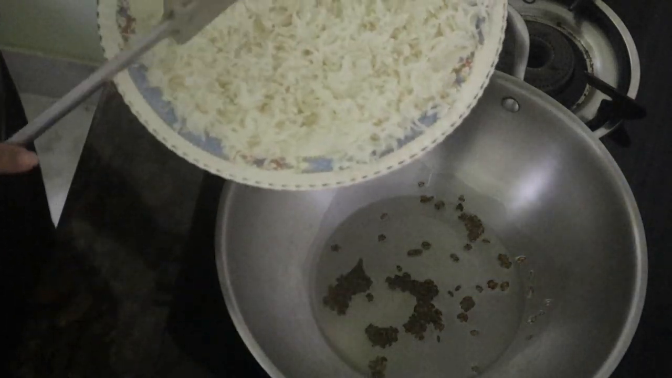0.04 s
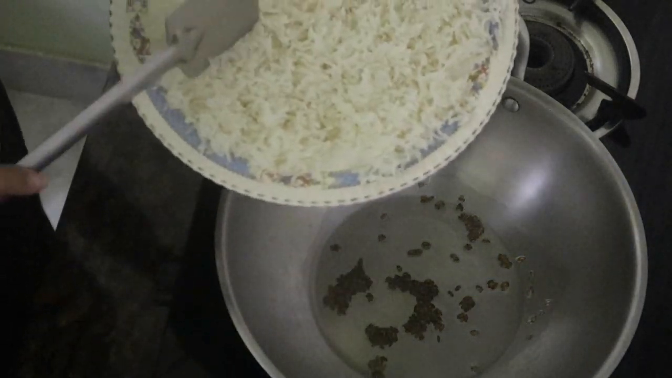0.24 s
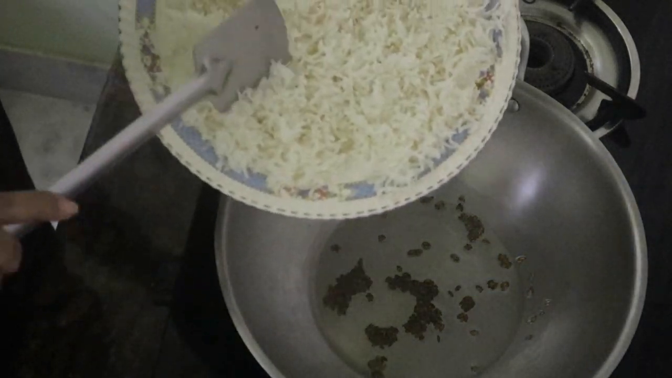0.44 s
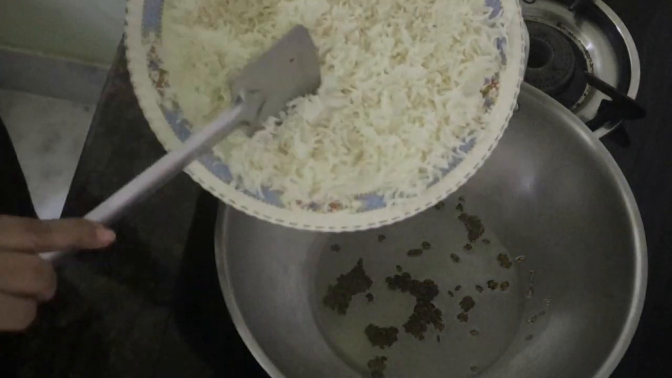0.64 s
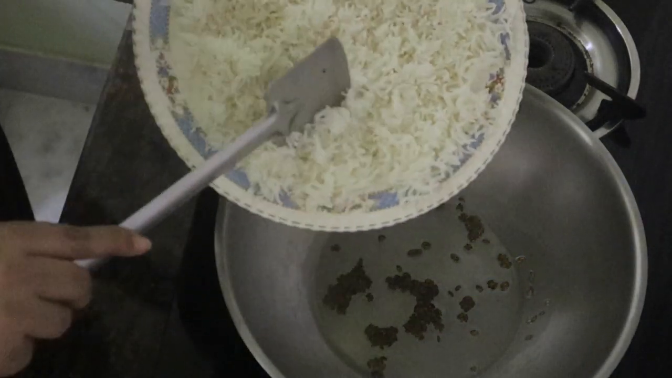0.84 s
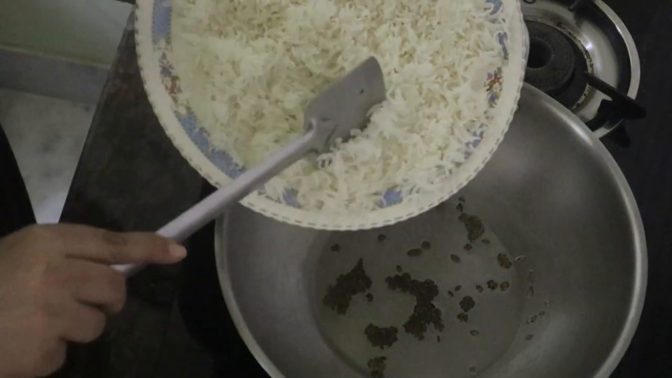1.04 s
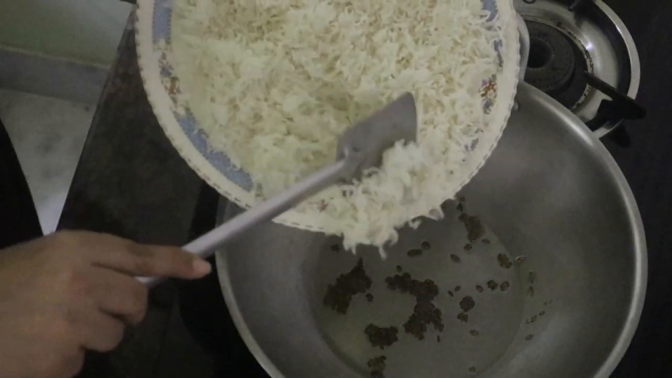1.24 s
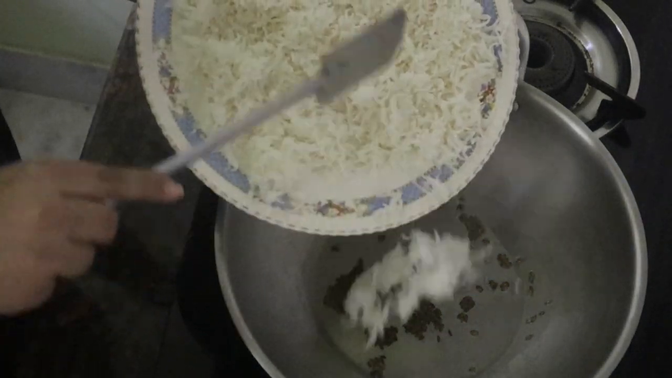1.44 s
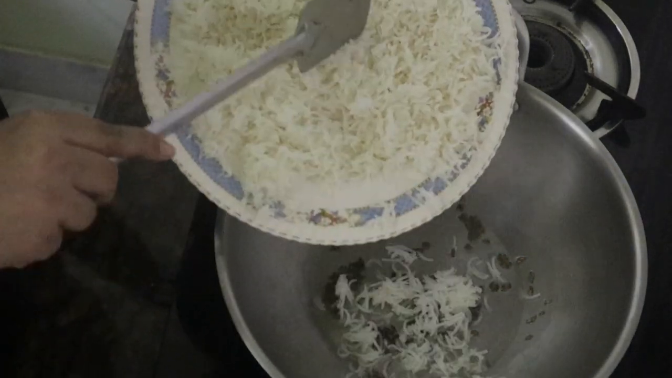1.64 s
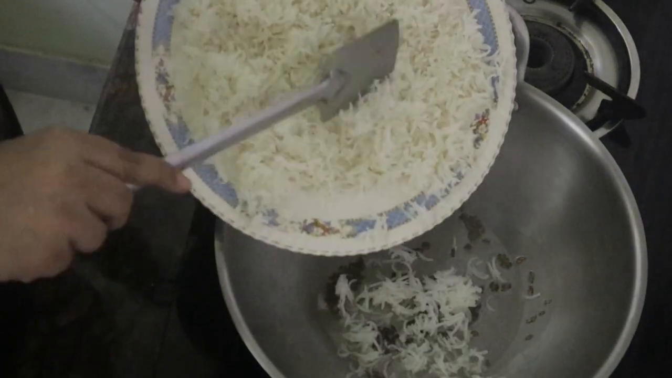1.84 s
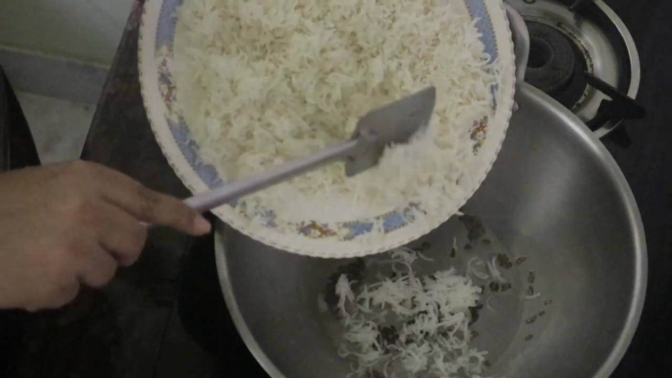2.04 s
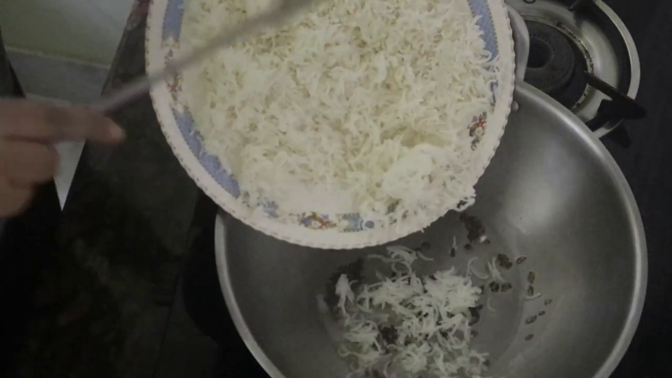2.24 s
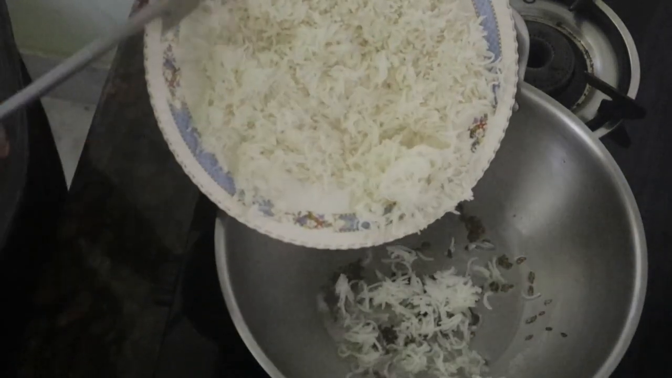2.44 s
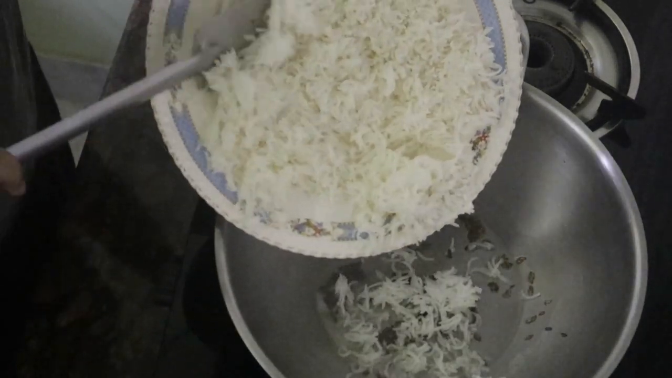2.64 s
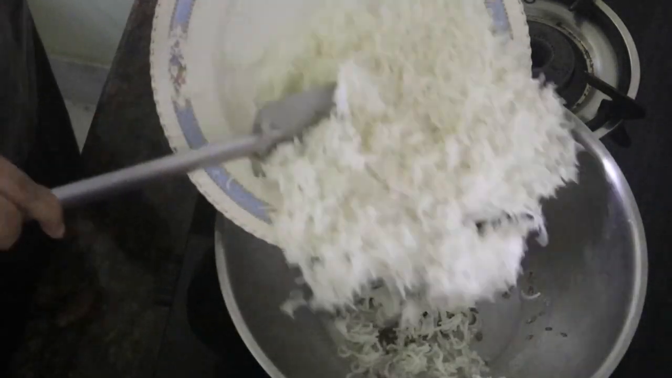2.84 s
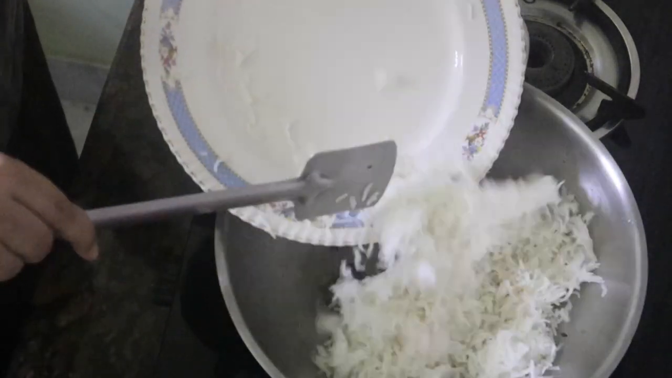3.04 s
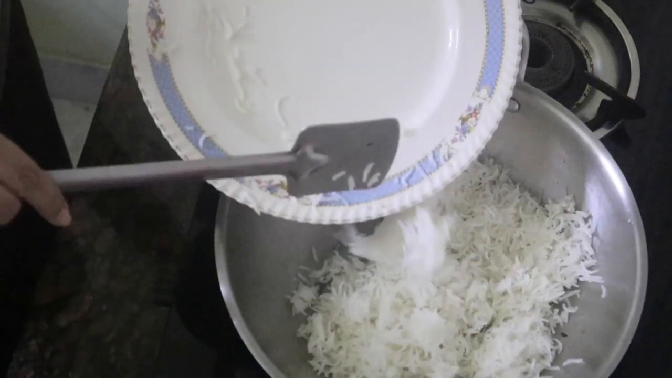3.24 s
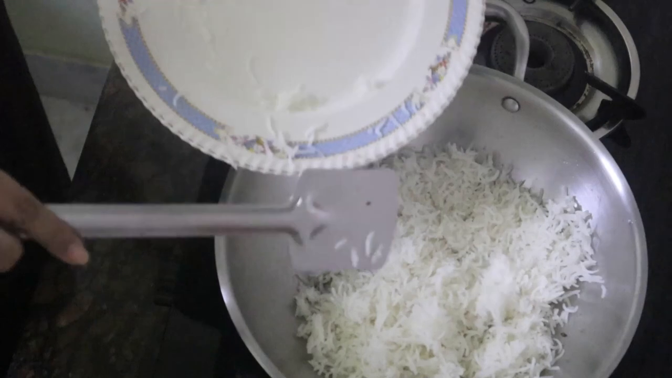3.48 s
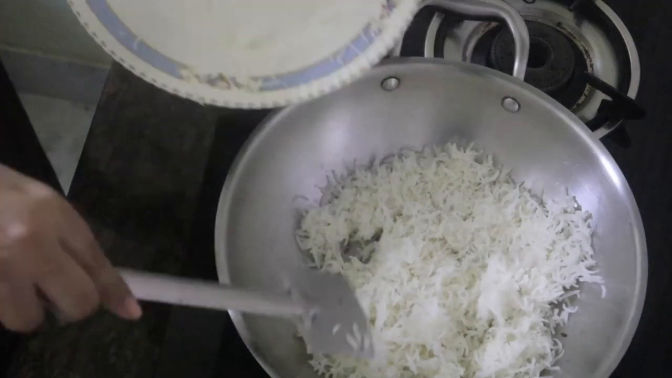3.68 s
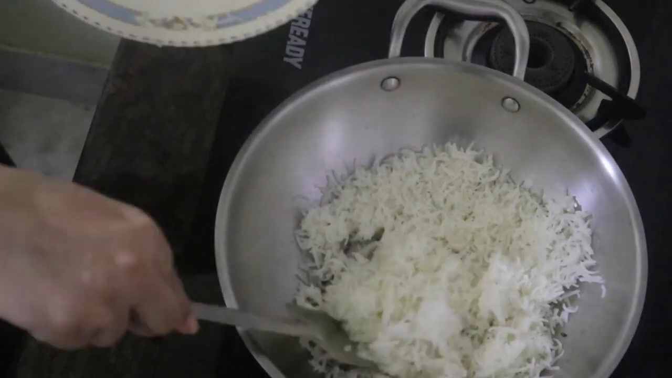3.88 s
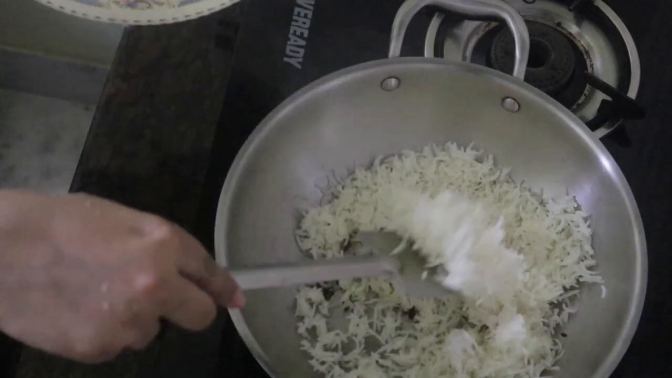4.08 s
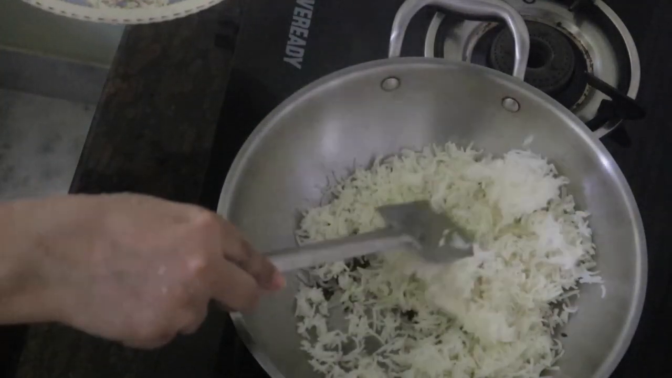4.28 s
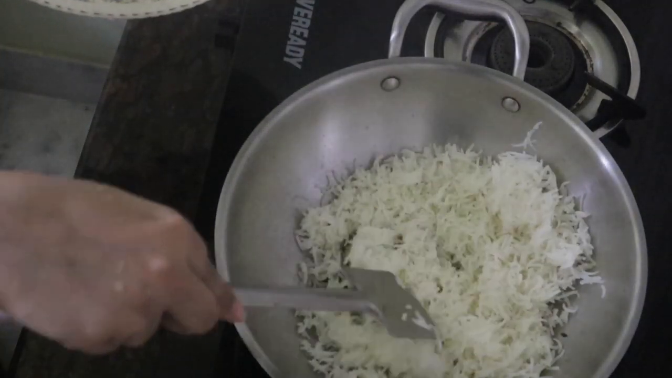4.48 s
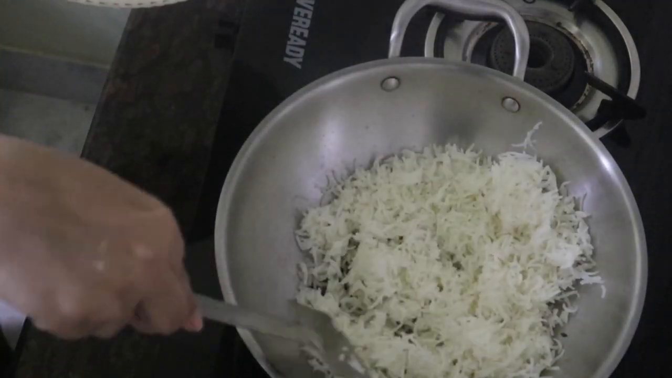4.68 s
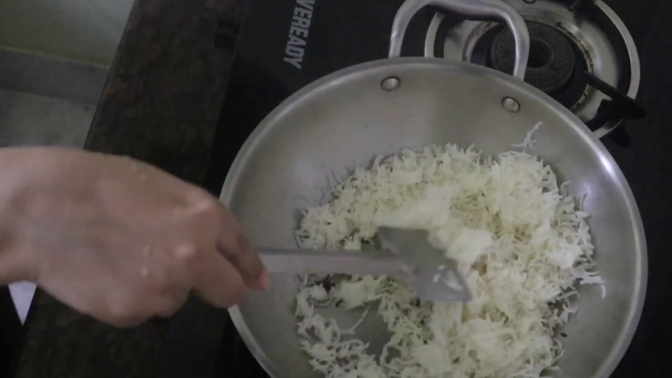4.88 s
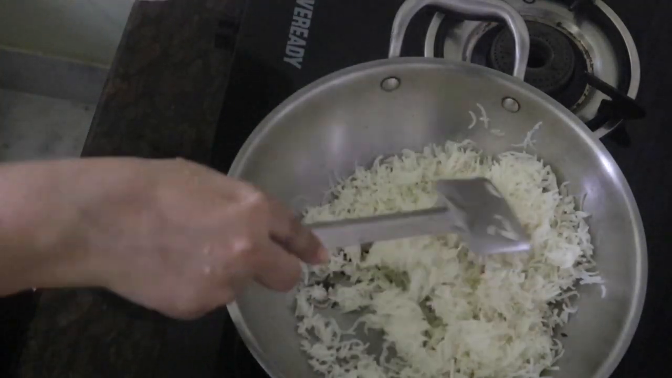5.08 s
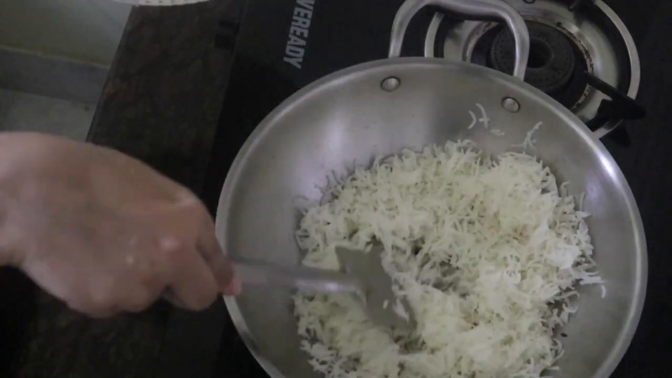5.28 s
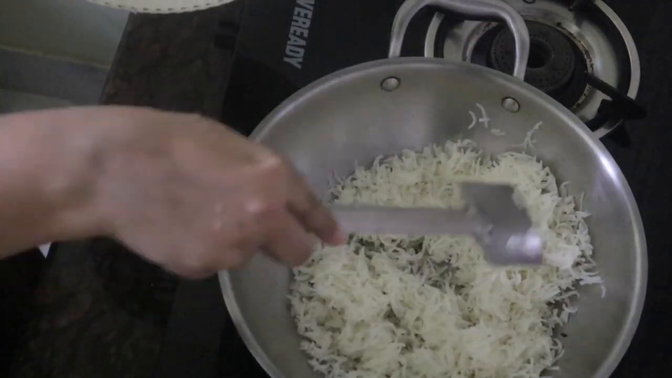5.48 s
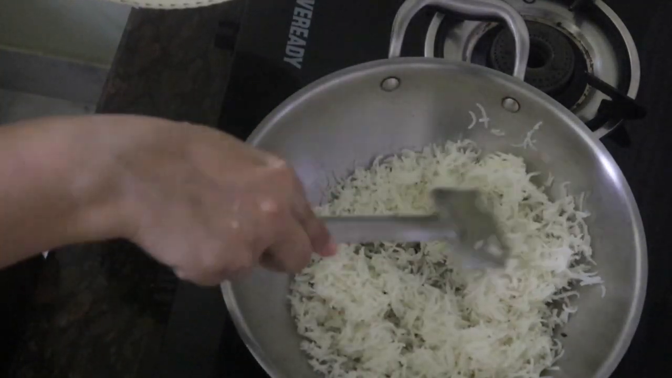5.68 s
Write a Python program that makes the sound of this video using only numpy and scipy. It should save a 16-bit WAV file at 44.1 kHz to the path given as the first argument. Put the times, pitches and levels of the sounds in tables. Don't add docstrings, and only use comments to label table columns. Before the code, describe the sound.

Moist rice falls into hot fat in a steel wok and bursts into a loud, popping, crackling sizzle that slowly calms as it is turned.

```python
import sys
import numpy as np
from scipy import signal
from scipy.fft import rfft, irfft, next_fast_len
from scipy.io import wavfile
from scipy.ndimage import uniform_filter1d

SR = 44100
rng = np.random.default_rng(int(sys.argv[2]) if len(sys.argv) > 2 else 0)


def natural_amplitude(level_db):
    exponent = np.asarray(level_db, float) / 20
    return 10 ** exponent


def wav_record(signal):
    frames = np.transpose(np.atleast_2d(signal))
    bounded = np.clip(frames, -1, 1)
    quanta = np.round(bounded * 32767).astype(np.int16)
    wavfile.write(sys.argv[1], SR, quanta)


N = 252252
CONTACT_S = 1.446

# [f/Hz, level/dB per Hz]
KITCHEN_SPECTRUM = [(40, -53), (100, -34), (140, -15.5), (200, -7), (420, -14), (600, -10.5), (830, -12),
                    (1400, -17), (2300, -23), (5500, -40), (10900, -35), (14000, -46), (15500, -62)]
# [f/Hz, width/Hz, level/dB]
HUM_MODES = [(193, 15.6, 1), (272.3, 15.6, 1), (335.3, 21, 1.5), (523, 28, -8)]
# [f/Hz, level/dB]
KITCHEN_WIDTH = [(60, -36), (110, -4), (200, -16), (380, -7), (700, -6.5), (1290, 1), (2380, 3), (4400, 7),
                 (8120, 2), (15000, -30)]
# [t/s, gain/dB]
CAMERA_GAIN = [(1.43, -3), (1.78, -8.5), (2.75, -7.5), (3.3, -8.5), (3.65, -13.5), (4.25, -12.5),
               (4.64, -20.5), (5.25, -17.5), (5.72, -18)]
# [t/s, peak/dB, decay/ms]
STEAM_FLARES = [(.22, -40, 4), (1.458, -36, 2.5), (1.53, -21, 2.4), (1.559, -13, 2.4), (1.605, -10, 3.2),
                (1.654, -8, 2.5), (1.671, -6, 2.8), (1.715, -11, 2.8), (1.829, -7, 2.2), (2.2422, -12, 1.7),
                (2.3005, -13, 2.2), (2.383, -10, 2.5), (2.4297, -6, 3), (2.504, -15, 2.3),
                (3.048, -7.5, 2.8), (5.0764, -16, 2.5)]
# [t/s, small bubbles on bare fat/dB, large bubbles under the rice/dB]
BOIL_LEVELS = [(1.45, -32.5, -54), (1.58, -25.5, -44.5), (1.62, -16, -43.5), (1.77, -22, -45),
               (1.97, -21, -40), (2.0, -23.5, -43), (2.55, -26, -35.5), (2.98, -27, -37),
               (3.04, -20.5, -34.5), (3.28, -22, -33), (3.33, -26.5, -33.5), (3.47, -20, -36.5),
               (3.83, -24, -39.5), (4.02, -19.5, -34), (4.18, -26.5, -38.5), (4.75, -31, -44.5),
               (5.3, -29.5, -40.5), (5.72, -31, -46.5)]
# [t/s, hold/s, fizz boost/dB, crackle boost/dB]
WET_SURGES = [(1.495, 0.01, -3, -5), (3.15, 0.015, -0.5, 3), (1.513, 0.021, 3, 0), (1.585, .008, -0.5, -3),
              (1.712, 0.011, -0.5, 0), (2.239, 0.016, -5, -5), (2.391, .012, 7.5, 3),
              (1.651, 0.0092, -0.5, 5), (1.772, 0.054, 1.5, 3.5), (2.01, 0.11, -1, 3.5),
              (2.136, 0.042, 1, 3.5), (2.285, 0.013, 4, 3.5), (2.347, 0.05, 0.5, 0.5), (2.471, .008, 5, 0),
              (2.503, .006, 5, -2), (2.597, 0.045, 3.5, 5), (2.675, 0.051, 1, 5.5), (2.785, 0.063, 3, -0.5),
              (3.002, 0.026, 3, 4), (4.15, 0.0043, -3, 8), (4.277, 0.045, 1.5, 3.5), (4.414, 0.02, 4, 6.5),
              (4.473, 0.023, 7, 6.5), (4.5, 0.077, 0.5, 2.5), (4.736, 0.018, -1.5, 5),
              (4.871, 0.11, 2.5, 3.5), (5.11, 0.011, -3, 3), (5.254, .006, 3.5, 9),
              (5.338, 0.042, 2.5, 2.5), (5.431, 0.047, 0.5, 2.8), (5.493, .05, -0.2, -1)]
# [f/Hz, level/dB per Hz]
FIZZ_SPECTRUM = [(2650, -12.5), (4500, -4), (6220, -4.5), (11500, 2), (15100, -16.5), (16000, -31)]
# [f/Hz, level/dB per Hz]
CRACKLE_SPECTRUM = [(700, -31), (1500, -32.5), (2100, -8.5), (2700, -2.5), (4000, -0.5), (5500, -3.5),
                    (8000, -6), (13000, -81), (16000, -12)]
# [f/Hz, level/dB]
PAN_WIDTH = [(200, -15), (700, -2), (1300, -2), (2400, 1), (4400, 2.5), (6500, 3.5), (9000, -0.5),
             (15000, 4.5)]
# [f/Hz, width/Hz, level/dB]
BOWL_MODES = [(542.7, 13.3, 0.5), (690.6, 18, 2.5), (737.5, 8.7, 3.2), (790, 14, -7), (874, 8.7, -1.5),
              (1228, 12, 3), (1710, 10, -19), (1808, 15, 2), (1990, 13, -1.5), (2180, 17, -26),
              (2560, 54, -7), (3166, 35, 1.5), (4040, 20, -3.5)]
# [t/s, level/dB]
GRAIN_TAPS = [
    (1.455, -41),
    (1.49, -41),
    (1.568, -39),
    (1.598, -42),
    (1.64, -36),
]
# [f/Hz, level/dB, t60/s]
TAP_MODES = [(960, 1.5, 0.43), (1960, 0.5, 0.12), (3080, -4, 0.19), (3760, -5, 0.27), (4700, -8, .1),
             (5900, -8, .09)]
# [t/s, peak/dB, dull share/0-1]
BURST_TICKS = [(1.4657, -25, 0.09), (1.469, -22, 0.05), (1.5131, -21, 0.26), (1.5299, -15, 0.21),
               (1.5678, -4, 0.23), (1.5774, -11, 0.38), (1.6722, -2, 0.2), (1.7999, -8, 0.26),
               (1.8747, -9, 0.22), (2.0164, -9, 0.52), (2.0305, -12, 0.21), (2.0442, -12, 0.51),
               (2.0943, -12, 0.58), (2.1378, -11, 0.58), (2.158, -11, 0.71), (2.2025, -6, 0.43),
               (2.2196, -7, 0.65), (2.3009, -3, 0.29), (2.3728, -10, 0.4), (2.4079, -5, 0.37),
               (2.4223, -5, 0.5), (2.4318, -2, 0.26), (2.6002, -10, 0.21), (2.6793, -11, 0.77),
               (2.7363, -11, 0.58), (2.9109, -9, 0.68), (2.9132, -13, 0.39), (2.9544, -10, 0.53),
               (3.0289, -5, 0.46), (3.0494, -3, 0.27), (3.056, -5, 0.22), (3.0861, -8, 0.29),
               (3.2303, -7, 0.6), (3.2413, -8, 0.39), (3.2967, -7, 0.38), (3.3776, -8, 0.35),
              (3.3973, -10, 0.45), (3.4995, -6, 0.34), (3.5386, -6, 0.31), (3.6787, -10, 0.15),
              (3.9549, -9, 0.23), (4.0631, -6, 0.25), (4.181, -10, 0.52), (4.2452, -14, 0.23),
              (4.2752, -8, 0.4), (4.3079, -9, 0.12), (4.4054, -13, 0.53), (4.4795, -5, 0.71),
              (4.5336, -14, 0.45), (4.5359, -14, 0.57), (4.5729, -14, 0.2), (4.6478, -17, 0.52),
              (4.6796, -17, 0.43), (4.7332, -17, 0.65), (4.7953, -18, 0.19), (4.8817, -15, 0.43),
              (4.9575, -11, 0.45), (5.002, -16, 0.2), (5.0778, -16, 0.22), (5.0895, -14, 0.16),
              (5.2159, -16, 0.53), (5.2776, -15, 0.36), (5.3122, -15, 0.44), (5.3651, -14, 0.12),
              (5.4274, -15, 0.44), (5.4533, -17, 0.48), (5.5518, -19, 0.22), (5.5565, -17, 0.28),
              (5.5704, -17, 0.23), (5.6245, -19, 0.61), (5.6767, -18, 0.22),
               (5.2545, -9, 0.4),
    (5.1, -13, 0.6),
    (4.5, -7, .5),
    (1.8, -8, .3),
    (3.6, -8, .2),
    (2.7, -16, .6),
]
# [t/s, peak/dB, pitch/Hz, treble snap minus peak/dB]
OPEN_POPS = [(1.4898, -21, 3220, 6), (1.5661, -14, 5900, 3), (1.5774, -9, 5800, 1), (1.597, -15, 5720, -2),
             (1.6449, -15, 4650, -3), (2.0021, -2, 4770, -0.5), (2.036, -8, 2610, -4),
             (2.1174, -4, 3960, 2), (2.1747, -6, 4220, -6), (2.2421, -4, 3830, 5.5), (2.2984, -20, 2580, 1),
             (2.3299, -5, 2660, 0), (2.3558, -7, 3290, 3.5), (2.4067, -8, 2180, 4), (2.4212, -10, 2980, -6),
             (2.4304, -6, 5830, -2), (2.4755, -11, 5720, 11.5), (2.503, 0.5, 4250, -1),
             (2.5683, -3, 3400, -8), (2.6272, -4.5, 2540, -3), (2.6424, -6, 3410, -15),
             (2.6814, -5, 2680, -16), (2.6871, -1, 2680, -17), (2.711, -4, 4060, -15),
             (2.7144, -5, 4480, 0), (2.7903, -8, 2820, 10), (2.7978, -2, 2470, 1.5), (2.8512, -11, 4600, 4),
             (2.8766, -6, 2790, -8), (2.9086, 1.5, 3520, -8)]
# [t/s, peak/dB, pitch/Hz]
HEAP_POPS = [(2.9344, -4.5, 3350), (2.955, -6, 3350), (3.0055, -16, 2600), (3.0474, -8, 2440),
             (3.1557, 0, 2600), (3.152, -1, 3850), (3.1807, -1.5, 2300), (3.2228, -6, 2430),
             (3.2288, -11, 1990), (3.273, -1.5, 3820), (3.3123, 1, 3960), (3.3478, -7, 2520),
             (3.3785, -3.5, 2540), (3.4984, -9, 2330), (3.8868, -5, 3900), (3.917, -3, 3080),
             (3.987, -1.5, 4750), (4.091, -7, 3150), (4.1496, -3, 3120), (4.284, -13.5, 2500),
             (4.273, -12, 3050), (4.413, -8, 2470), (4.476, -9, 3000), (4.4854, -9, 3000), (4.7, -9, 3810),
             (5.0562, -11, 2240), (5.1066, -8.5, 3300), (5.2536, -4.5, 2600), (5.444, -9, 4300),
             (5.687, -12, 4540)]
# [t/s, peak/dB]
BOWL_KNOCKS = [(2.137, -20), (2.158, -18.5), (2.22, -24), (2.459, -23), (2.503, -40), (2.62, -19),
               (2.711, -23), (2.79, -23), (2.937, -26), (3.156, -21), (3.295, -32), (3.499, -20.5),
               (4.284, -28), (4.41, -39), (4.475, -24), (4.52, -31), (5.057, -41), (5.179, -28.5),
               (5.253, -40)]
# [t/s, sign, left/dB, right/dB, length/ms]
SPIT_PUFFS = [
    (2.5052, -1.04, -2, 1.1, 0.7),
    (2.713, 1, -33, -28, 0.43),
    (2.717, 1, -26, -15.5, 0.27),
    (3.311, 0.62, -44, -42, 1.5),
    (4.48, 1, -34, -20, 0.26),
    (4.4906, 0.79, -35, -35, 0.29),
    (5.0578, 0.84, -16, -12.5, 0.19),
    (5.445, 0.92, -18, -18.5, 0.14),
]
# [start/s, end/s]
OPEN_SPANS = [(.535, .55), (1.45, 1.55), (1.57, 1.6), (1.97, 2.06), (2.09, 2.16), (2.18, 2.29),
              (2.33, 2.41), (2.48, 2.53), (2.64, 2.76), (2.87, 3.01), (4.47, 4.51), (5.05, 5.075),
              (5.23, 5.26), (5.35, 5.37), (5.4, 5.49)]
LOADS_S = [
    1.59,
    3.03,
]


def shape(x, table):
    hz, db = np.transpose(table)
    size = next_fast_len(N + 4096)
    f = np.maximum(np.arange(size // 2 + 1) * SR / size, 1)
    gain = natural_amplitude(np.interp(np.log(f), np.log(hz), db))
    return irfft(rfft(x, size) * gain, size)[..., :N]


def unit(x, lo_hz, hi_hz):
    sos = signal.butter(4, [lo_hz, hi_hz], "band", fs=SR, output="sos")
    return x / np.std(signal.sosfilt(sos, x))


def ring(x, hz, width_hz):
    b, a = signal.iirpeak(min(hz, 0.45 * SR), hz / width_hz, SR)
    return signal.lfilter(b, a, x)


def walk(rate_hz):
    hold = int(SR / rate_hz)
    steps = np.repeat(rng.standard_normal(N // hold + 1), hold)
    return 0.86 * uniform_filter1d(uniform_filter1d(steps, hold), hold)[:N]


def bursts(per_s, spread_db, cap=3.35):
    when = rng.random(N)
    size = rng.exponential(size=N)
    return -natural_amplitude(spread_db * np.minimum(size, cap)) * np.clip((per_s / SR - when) * 3000, 0, 1)


def spread(x, echo_s, echo_db, width):
    right_lean = 0.28
    hop = 256
    count = N // hop
    t = np.arange(1024) / SR
    window = np.sin(np.pi * np.arange(2 * hop) / (2 * hop))
    index = np.arange(count)[:, None] * hop + np.arange(2 * hop)
    frames = x[np.minimum(index, N - 1)] * window
    echoes = rng.standard_normal((2, count, len(t))) * np.exp(-t / echo_s) * (t > 0.0005)
    echoes /= np.sqrt(np.sum(echoes ** 2, axis=2, keepdims=True))
    blocks = irfft(rfft(frames, 6 * hop) * rfft(echoes, 6 * hop), 6 * hop)
    blocks = blocks.reshape(2, count, 6, hop)
    wet = sum(np.pad(blocks[:, :, k], ((0, 0), (k, 7 - k), (0, 0))) for k in range(6))
    wet = wet.reshape(2, -1)[:, :N]
    mid = (x + natural_amplitude(echo_db) * wet[0]) / np.sqrt(1 + natural_amplitude(2 * echo_db))
    side = np.sqrt(1 - right_lean ** 2) * wet[1] - right_lean * mid
    return np.array([mid, shape(side, width)])


def kitchen():
    hum_db, draught_db = -44.5, -43.5
    draught_per_gain = 1.93
    air = rng.standard_normal((2, N))
    hum = sum(natural_amplitude(db + 3.5 + 0.83 * walk(5.33)) * ring(air, hz, width) for hz, width, db in HUM_MODES)
    mid, side = shape(air * natural_amplitude(0.82 * walk(3.5)) + hum, KITCHEN_SPECTRUM)
    gain_db = np.interp(np.arange(N) / SR, *np.transpose(CAMERA_GAIN))
    scale = natural_amplitude(hum_db + gain_db) * unit(mid, 204.5, 280)[-1] / mid[-1]
    drone = ring(air[0], 77, 26) * 14.0 + ring(ring(air[0], 62, 70), 68, 90)
    draught = natural_amplitude(draught_db + draught_per_gain * gain_db + 0.5) * unit(drone, 25, 140)
    room_side = scale * (shape(side, KITCHEN_WIDTH) - 0.037 * mid)
    return np.array([scale * mid + draught, room_side - 0.092 * draught])


def flares():
    out = np.zeros(N)
    t = np.arange(900) / SR
    grit = rng.standard_normal((len(STEAM_FLARES), len(t)))
    for (s, db, ms), g in zip(STEAM_FLARES, grit):
        i = int((s + 0.0008) * SR)
        out[i:i + len(t)] += natural_amplitude(db - 0.5) * ring(g, 7500, 4200) * np.exp(-t * 1000 / ms)
    return out


def boil():
    warm_up_s, cold_db = 0.16, -15
    attack_s, release_s = 0.0048, 0.016
    crackle_db, crackle_per_fizz, crackle_per_burble = -29.5, 0.79, 0.26
    burble_per_surge = 0.76
    ring_db, heaped_s, muffle_db_per_s = 0.5, 2.2, -2.5
    t = np.arange(N) / SR
    rows = np.transpose(BOIL_LEVELS)
    small = np.interp(t, rows[0], rows[1])
    large = np.interp(t, rows[0], rows[2])
    cold = cold_db * np.clip(1 - (t - CONTACT_S) / warm_up_s, 0, 1)
    crack = crackle_db + crackle_per_fizz * (small + 25) + crackle_per_burble * (large + 40) + cold
    for s, hold, fizz_boost, crackle_boost in WET_SURGES:
        rise = (t - s) / attack_s + 1
        fall = (s + hold - t) / release_s + 1
        swell = np.clip(np.minimum(rise, fall), 0, 1)
        small = small + fizz_boost * swell
        crack = crack + crackle_boost * swell
        large = large + burble_per_surge * crackle_boost * swell
    muffle = muffle_db_per_s * np.maximum(t - heaped_s, 0)
    return small, crack, large + 0.35 * cold, large + 0.4 * cold + ring_db + muffle


def fizz():
    out = 0
    swarm = 1.0 * walk(24.47) + 2.16 * walk(110)
    for hz in 5000 * 2 ** (np.arange(8) / 4.05):
        patch = natural_amplitude(swarm + 0.83 * walk(40))
        out = out + patch * ring(bursts(2500, spread_db=4.5), hz, hz / 4)
    flat = out / np.sqrt(np.mean(out ** 2)) + 0.21 * rng.standard_normal(N)
    return unit(shape(flat, FIZZ_SPECTRUM), 3500, 21000)


def crackle():
    clicks = bursts(696, spread_db=4.0, cap=1.9) * natural_amplitude(2.0 * walk(35))
    fine = bursts(4000, spread_db=2.0) * natural_amplitude(2.9 * walk(60))
    return sum(share * (x - np.mean(x)) / np.std(x) for x, share in [(clicks, 0.9), (fine, 1.1)])


def bowl(force):
    modes = sum((-1) ** k * natural_amplitude(db) * ring(force, hz, width)
                for k, (hz, width, db) in enumerate(BOWL_MODES))
    thud = 0.22 * ring(force, 520, 870)
    return shape(modes + thud, [(200, -22), (450, -13), (540, -0.5), (16000, 4.5)])


def taps():
    t = np.arange(N) / SR
    out = np.zeros(N)
    for s, db in GRAIN_TAPS:
        for hz, mode_db, t60_s in TAP_MODES:
            decay = natural_amplitude(db + mode_db - 60 * np.maximum(t - s, 0) / t60_s)
            out += decay * (t > s) * np.sin(2 * np.pi * hz * (t - s))
    return out


def ticks():
    bright_hz, dull_hz = 10000, 3500
    echoes = [(0.5, -9), (1.3, -13)]
    lead = 20
    out = np.zeros((2, N + 200))
    t = (np.arange(200) - lead) / SR
    scatter = sum(natural_amplitude(db - 11.0) * np.exp(-((t * 1000 - ms) / 0.15) ** 2) for ms, db in echoes)
    scatter = scatter + natural_amplitude(-31.5) * (t > 0) * np.exp(-t / 0.0031)
    rows = BURST_TICKS
    grit = rng.standard_normal((len(rows), 2, len(t)))
    for (s, db, dull), g in zip(rows, grit):
        dull = np.clip(dull, 0, 1)
        pulse = -sum(share * np.cos(2 * np.pi * hz * t) * np.exp(-(t * hz / cycles) ** 2)
                     for share, hz, cycles in [(1 - dull, bright_hz, 0.95), (dull, dull_hz, 0.5)])
        mid, side = (np.convolve(pulse, v * scatter)[lead:lead + 200] for v in g)
        i = int(s * SR) - lead
        out[:, i:i + len(t)] += natural_amplitude(db + 3.5) * np.array([pulse + mid, 2.6 * side - 0.12 * pulse])
    return out[:, :N]


def pops():
    heap_snap_db = -11
    out = np.zeros(N + 600)
    t = np.arange(600) / SR
    rows = OPEN_POPS + [(*row, heap_snap_db) for row in HEAP_POPS]
    grit = rng.standard_normal((len(rows), len(t)))
    for (s, db, hz, snap_db), g in zip(rows, grit):
        i = int((s + 0.00098) * SR)
        body = -np.cos(2 * np.pi * hz * t) * np.exp(-t * hz / 0.68)
        tail = 0.3 * ring(g, hz, hz) * np.exp(-t / 0.0018)
        snap = natural_amplitude(snap_db) * ring(g, 9400, 4000) * np.exp(-t / 0.00063) * 1.76
        out[i:i + len(t)] += natural_amplitude(db + 0.96) * (body + tail + snap)
        out[i] -= 1.1 * natural_amplitude(db)
    return shape(out[:N], [(150, -37), (600, -8.0), (1500, -1.0), (13000, -3.5), (16000, -24)])


def knocks():
    force = np.zeros(N)
    for s, db in BOWL_KNOCKS:
        force[int((s + 0.002) * SR)] = natural_amplitude(db + 40.5)
    return bowl(ring(force, 520, 910))


def puffs():
    t = np.arange(N) / SR
    capsules = np.zeros((2, N))
    duck_db = 0
    for s, sign, left_db, right_db, ms in SPIT_PUFFS:
        for k, (db, lag_s, stretch) in enumerate([(left_db, 0, 1), (right_db, 0.0005, 1.9)]):
            u = np.maximum(t - s - lag_s, 0) / (ms * stretch / 2000)
            capsules[k] += sign * natural_amplitude(db) * np.e * u * np.exp(-u)
        u = np.maximum(t - s, 0)
        duck_db = duck_db - 19 * natural_amplitude(right_db) * (1 - np.exp(-u / 0.0045)) * np.exp(-u / 0.02)
    low_cut = signal.butter(2, 48, "high", fs=SR, output="sos")
    left, right = signal.sosfilt(low_cut, capsules)
    return np.array([left - 0.016 * right, right - 1.5 * left]), duck_db


def scene():
    spatter = crackle()
    puff, duck_db = puffs()
    onset = np.clip((np.arange(N) / SR - CONTACT_S) / 0.019, 0, 1)
    gain = onset * natural_amplitude(duck_db)
    fizz_db, crackle_db, burble_db, ring_db = boil()

    crackling = unit(shape(spatter, CRACKLE_SPECTRUM), 2100, 5600)
    burble = unit(ring(ring(spatter, 1580, 2840), 1580, 2840), 1140, 2420)
    fry = natural_amplitude(fizz_db) * fizz() + natural_amplitude(crackle_db - 1.5) * crackling + natural_amplitude(burble_db - 2.5) * burble
    fry = gain * fry

    ring_gain = gain * natural_amplitude(ring_db - 3.0)
    steel = ring_gain * unit(bowl(spatter), 410, 1600) + knocks() + taps()
    steel_side = natural_amplitude(-16.0) * np.roll(steel, 25) - 0.02 * steel

    mix = spread(fry, 0.011, -3.5, PAN_WIDTH)
    mix = mix + spread(pops() + flares(), 0.00089, -7.5, PAN_WIDTH)
    mix = mix + natural_amplitude(duck_db) * kitchen() + np.array([steel, steel_side]) + ticks()
    mid, side = mix
    mid = mid + ring_gain * unit(bowl(rng.standard_normal(N)), 410, 1600)
    return np.array([mid + side, mid - side]) + puff


def mono_edge(s):
    quiet_hz, frying_hz, late_hz, late_s = 7530, 8250, 7260, 4.38
    dip_hz, back_s = 2350, 0.18
    dip = sum((s > load) * np.exp(-np.maximum(s - load, 0) / back_s) for load in LOADS_S)
    early_hz = np.where(s < CONTACT_S, quiet_hz, frying_hz) - dip_hz * dip
    return np.where(s < late_s, early_hz, late_hz)


def top_cut(x):
    return signal.sosfilt(signal.butter(12, 15950, fs=SR, output="sos"), x)


def record(dry):
    mid_side = np.array([dry[0] + dry[1], dry[0] - dry[1]]) / 2
    hz, s, (mid, side) = signal.stft(mid_side, SR, nperseg=1024)
    tiles = rng.random((2, len(hz) // 12 + 1, len(s) // 3 + 1)).repeat(12, 1).repeat(3, 2)
    patch, hole = tiles[:, :len(hz), :len(s)]
    stereo_share = 0.17 * (s > OPEN_SPANS[1][0]) + sum((s > a) & (s < b) for a, b in OPEN_SPANS)
    mono = (patch > stereo_share) & (hz[:, None] > mono_edge(s))
    alive = hole > 0.3 * np.clip(hz[:, None] / 16000, 0, 1) ** 9
    folded = np.array([mid * np.where(mono, natural_amplitude(4.0), 1), side * ~mono]) * alive
    mid, side = signal.istft(folded, SR, nperseg=1024)[1][:, :N]
    wide = np.array([mid + side, mid - side])
    return top_cut(np.tanh(0.76 * wide) / 0.85)


dry = scene()
out = record(dry)
wav_record(out)
```